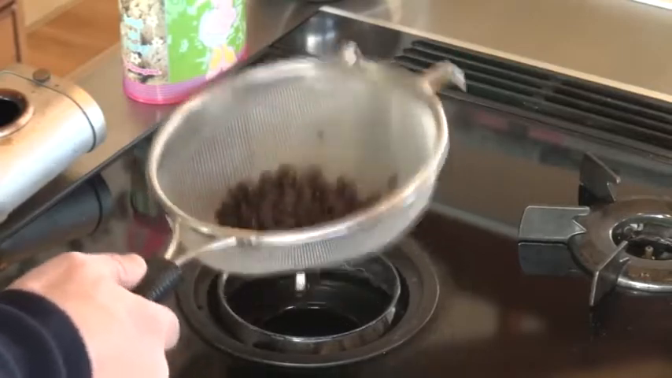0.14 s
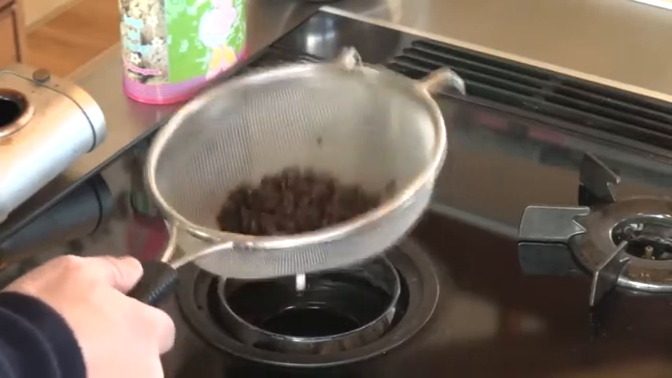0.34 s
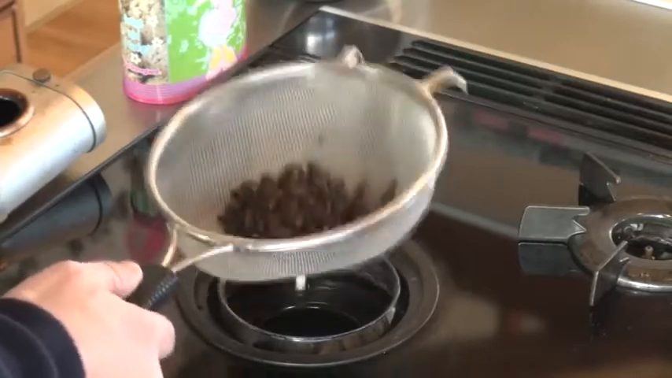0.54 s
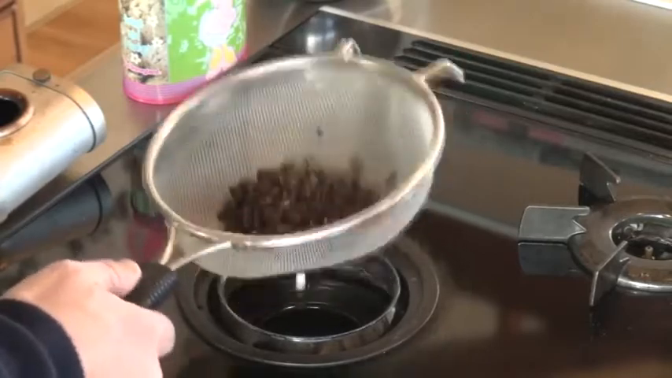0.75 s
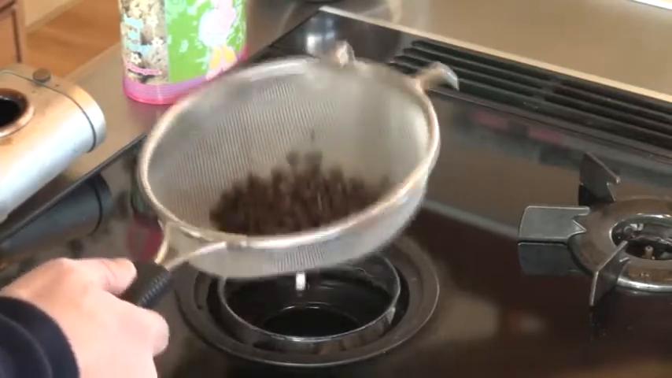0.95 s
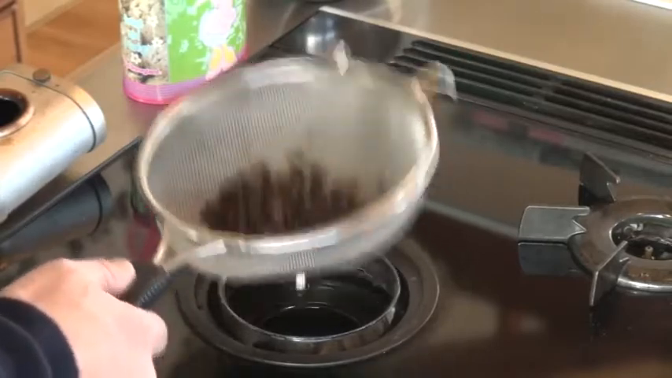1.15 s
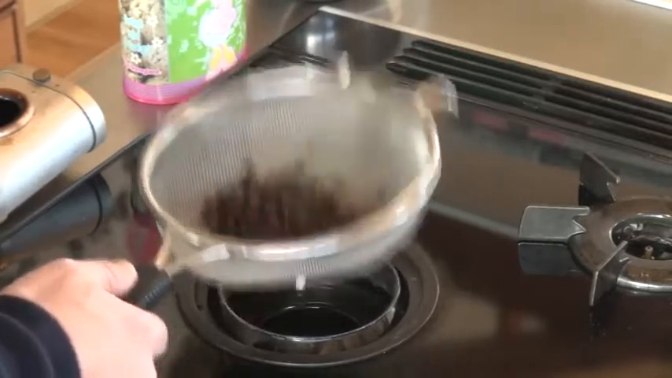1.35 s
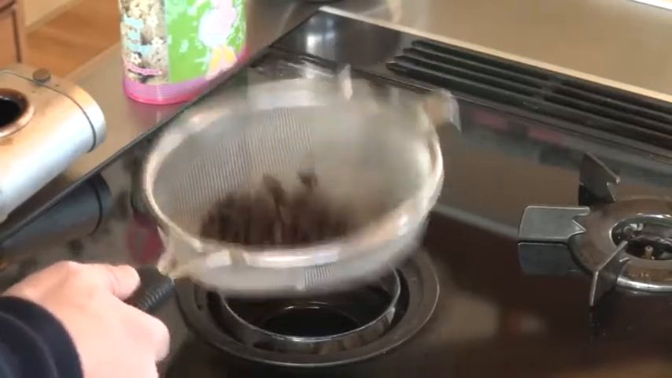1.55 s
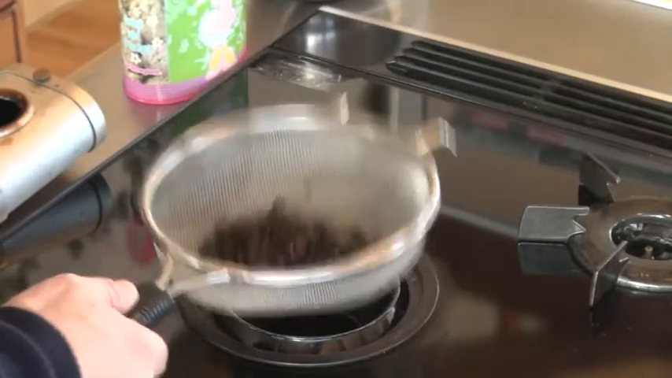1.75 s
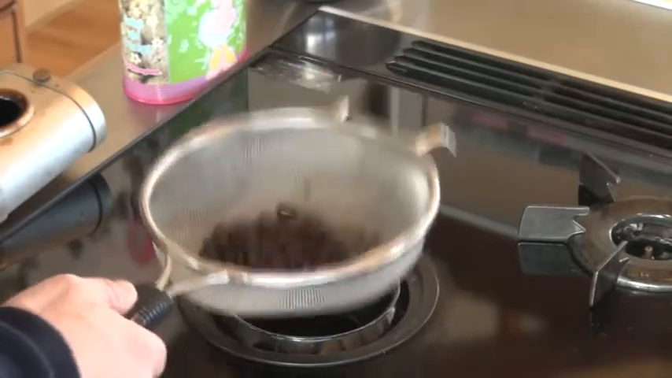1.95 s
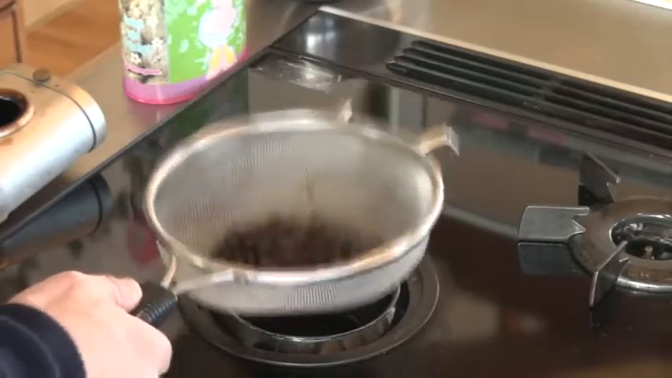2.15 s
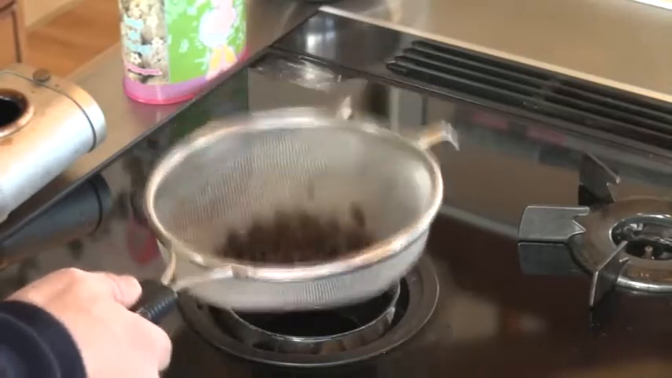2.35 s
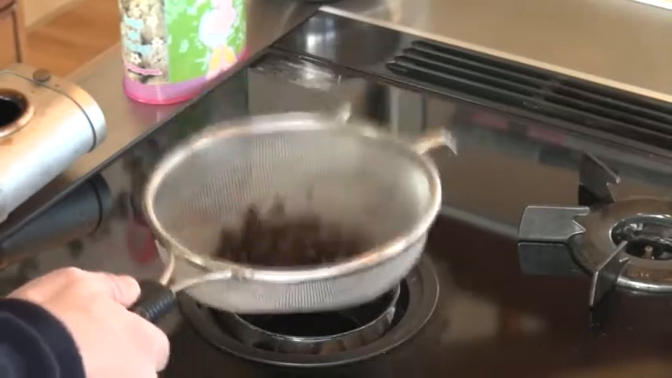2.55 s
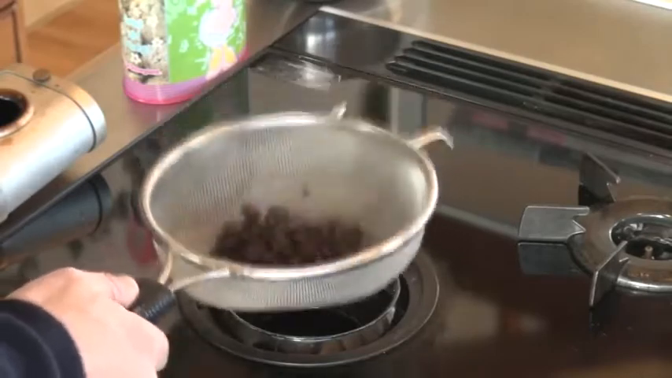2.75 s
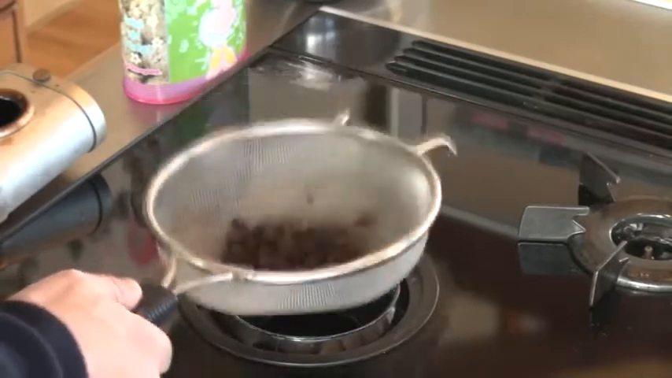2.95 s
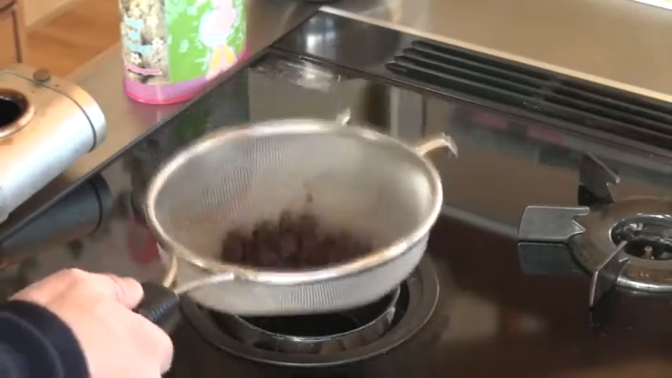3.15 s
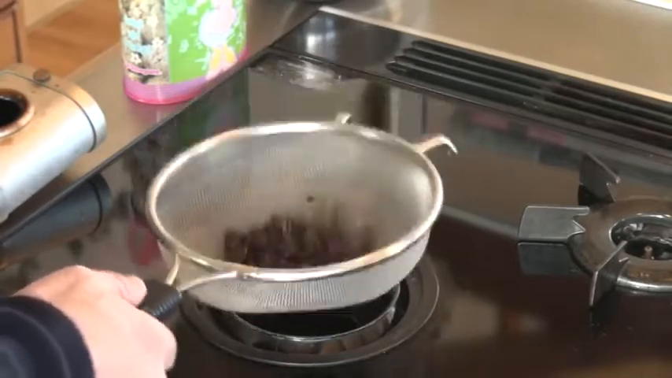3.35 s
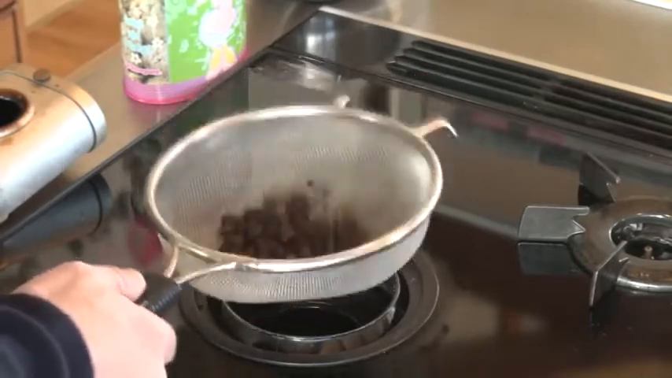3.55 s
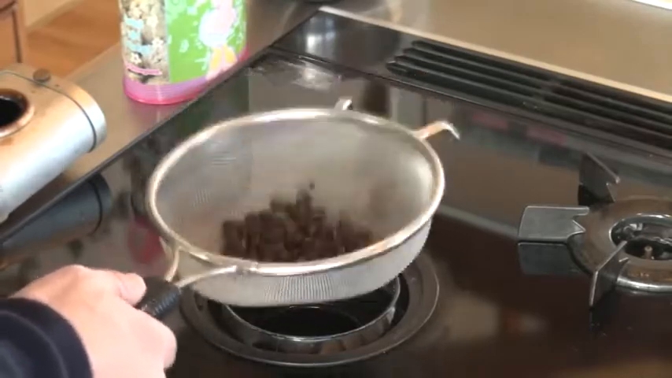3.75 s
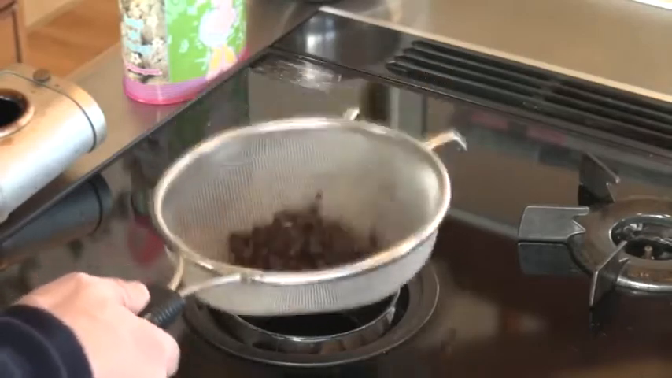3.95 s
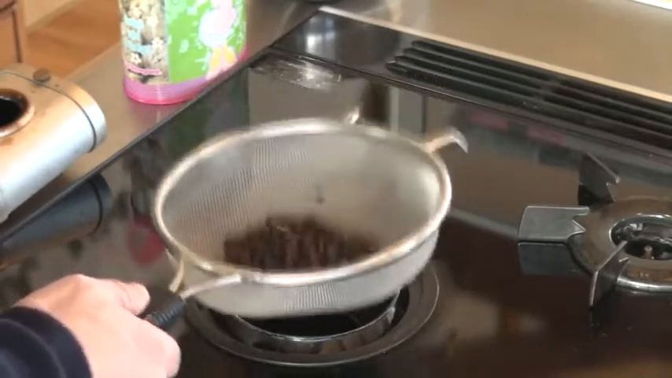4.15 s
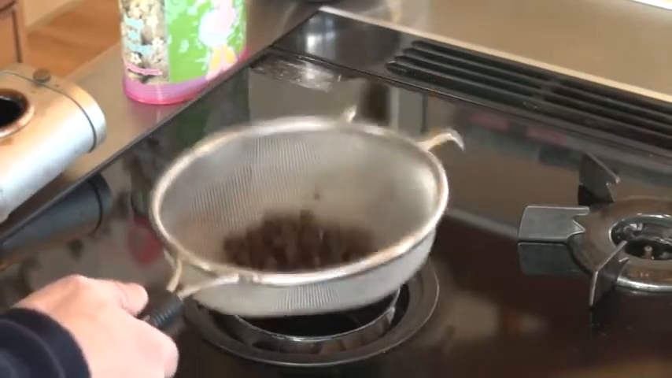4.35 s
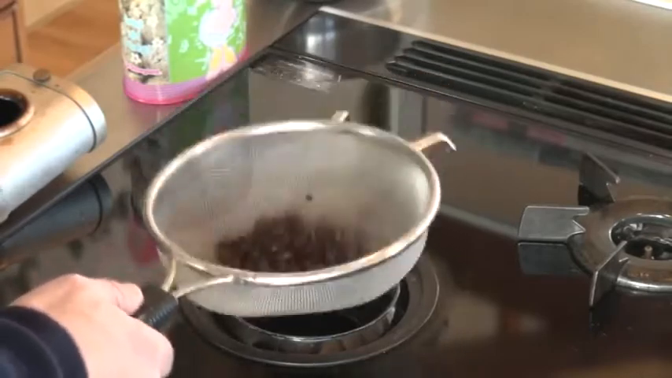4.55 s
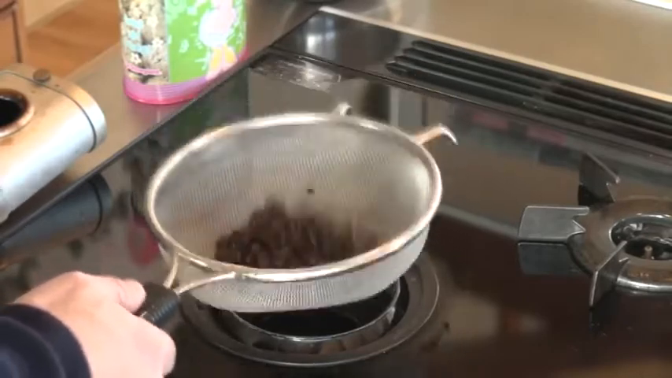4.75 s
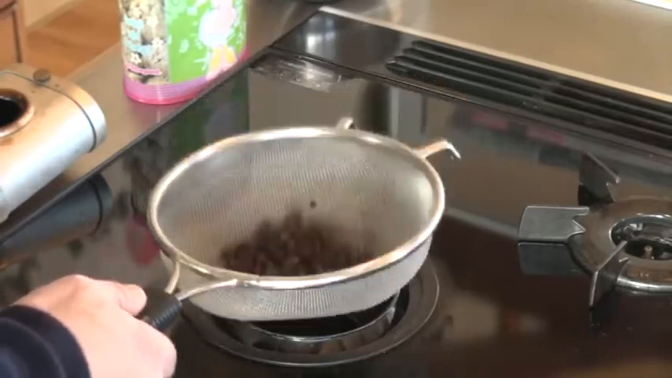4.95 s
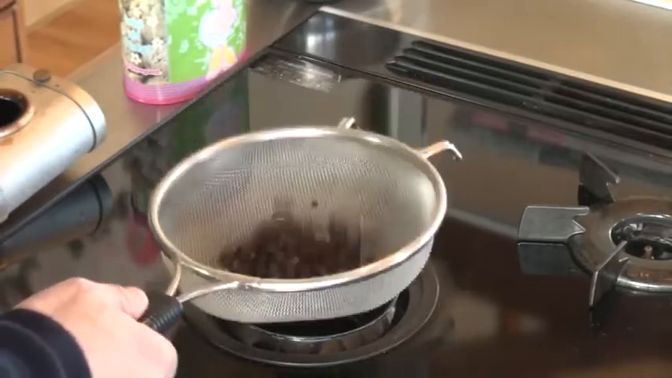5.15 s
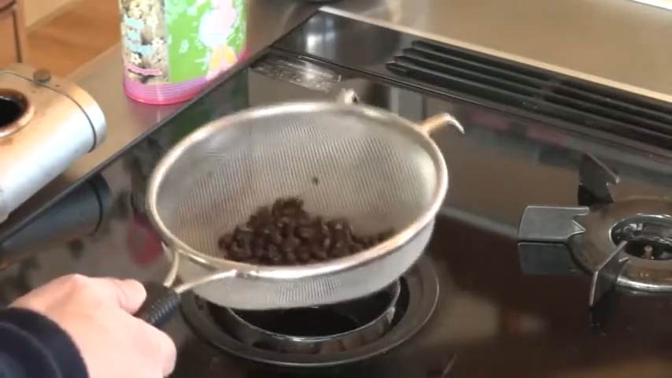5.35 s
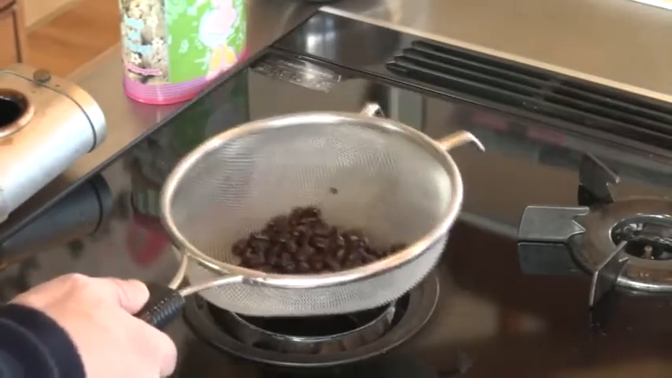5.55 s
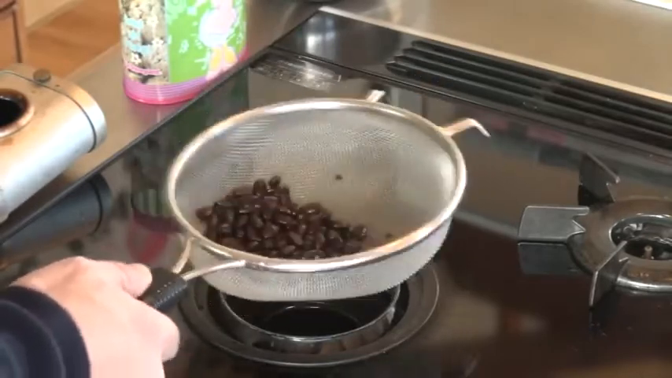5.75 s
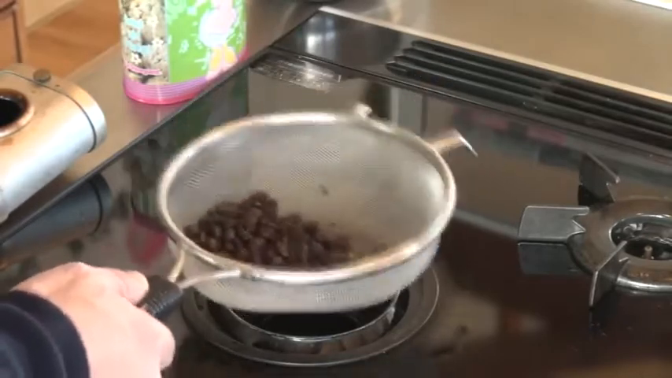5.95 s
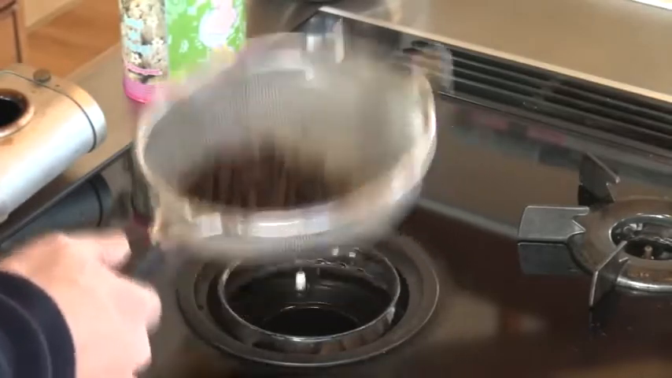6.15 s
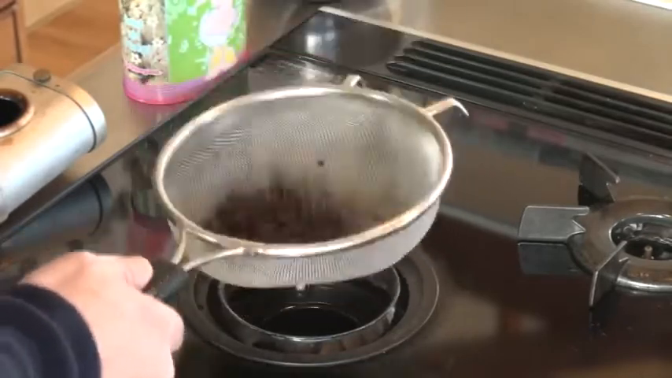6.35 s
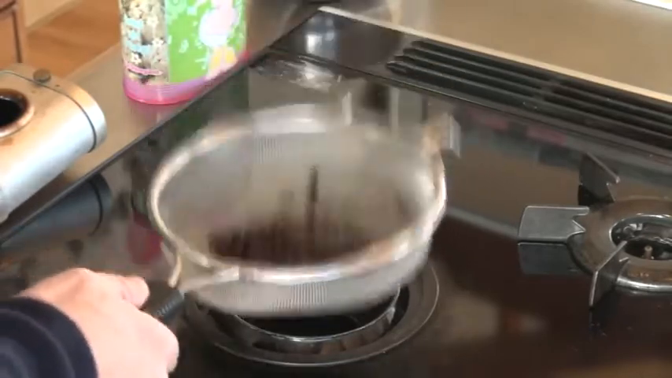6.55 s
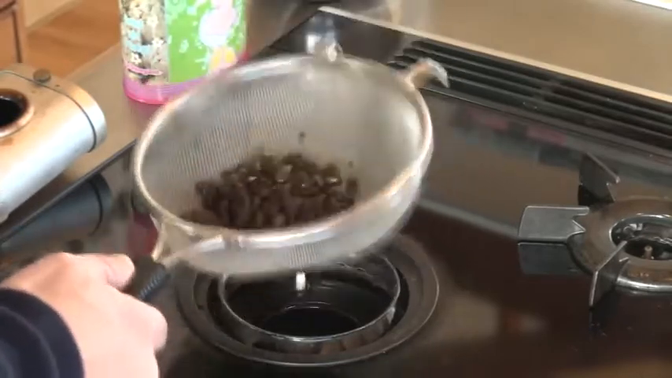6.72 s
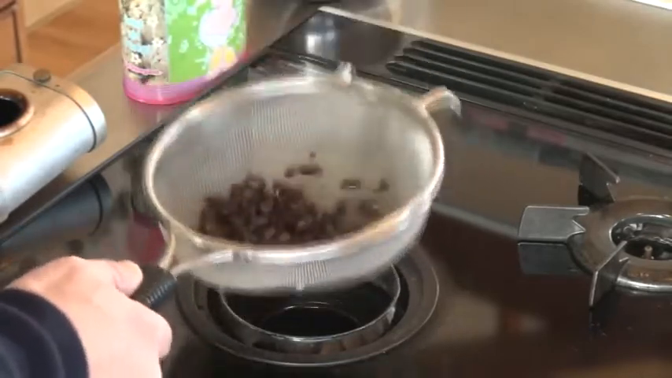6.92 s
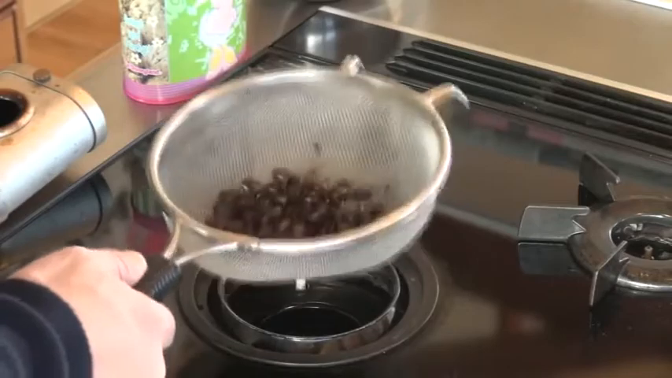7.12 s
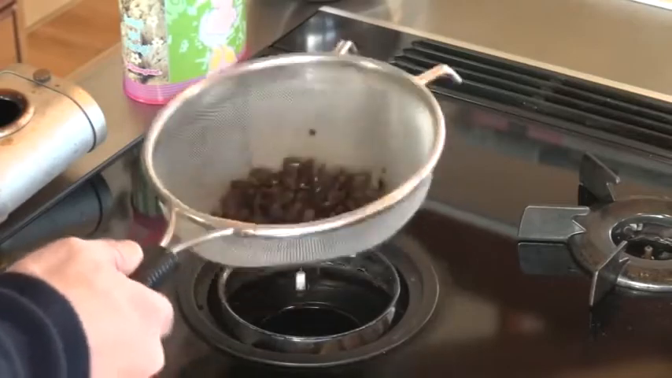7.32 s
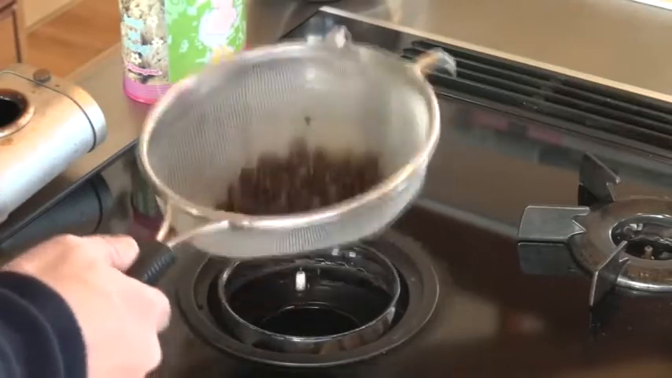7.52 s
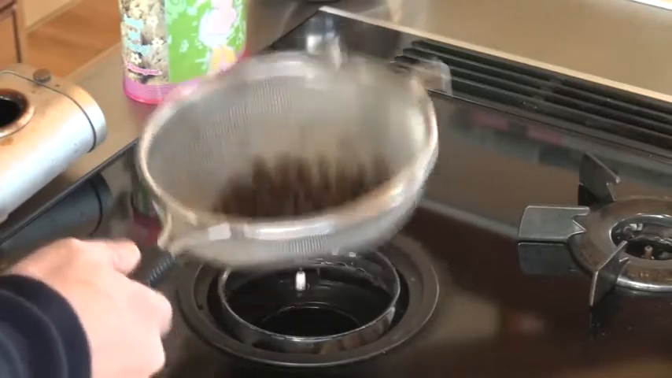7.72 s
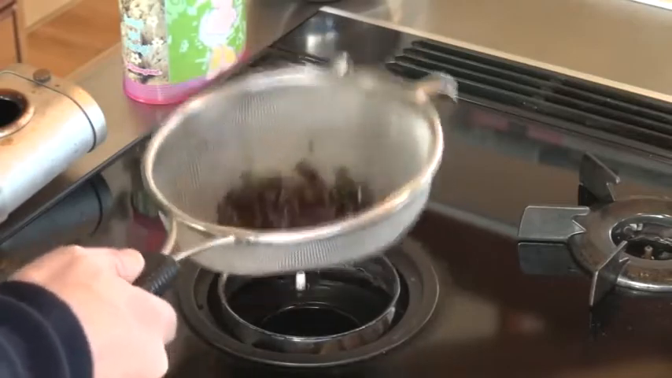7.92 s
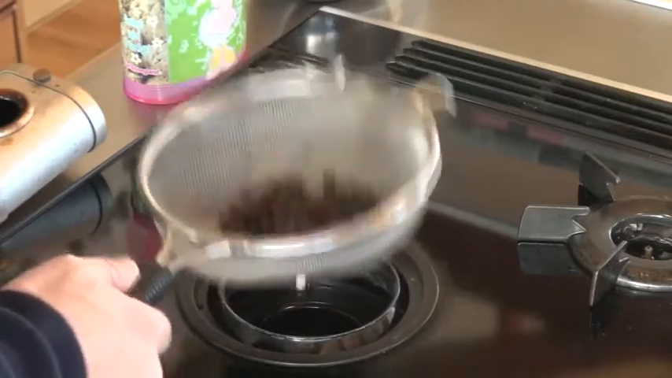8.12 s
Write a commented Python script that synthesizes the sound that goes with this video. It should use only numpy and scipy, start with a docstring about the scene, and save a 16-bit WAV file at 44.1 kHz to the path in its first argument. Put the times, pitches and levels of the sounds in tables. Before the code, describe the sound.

From the start, roasted coffee beans are tossed in a wire mesh strainer in a steady rhythm of about five shakes a second. Each landing is a short, bright, dry shower of tiny clicks that lightly rings the wires, varying a little in strength. At about 5.3 seconds the tossing stops, and a couple of faint ticks follow. From roughly 5.7 to 6.2 seconds the beans slide round the bowl in a softer, duller swirl. At 6.5 seconds a sharp landing restarts the shaking, which continues a little less evenly until about 8.3 seconds, with a few stray beans ticking in between tosses. Throughout, an extractor fan runs underneath with a quiet, steady hum and rush of air. The strainer sits straight ahead, and the small kitchen adds short reflections to every rattle.

```python
"""A small kitchen, an extractor fan humming steadily. Roasted coffee beans are tossed in a wire-mesh
strainer about five times a second, with one pause to swirl them. Each landing is a short shower
of tiny impacts that ring the mesh; a few strays tick in late, and the room answers.
The hum is turbulent air ringing the fan's hood and duct."""
import sys
import numpy as np
from scipy import signal
from scipy.fft import rfft, irfft
from scipy.io import wavfile

SR = 44100
rng = np.random.default_rng(int(sys.argv[2]) if len(sys.argv) > 2 else 0)


def store_pcm(level_fs):
    """Save levels as 16-bit WAV."""
    pcm = np.round(np.clip(level_fs, -1, 1) * 32767).astype(np.int16)
    wavfile.write(sys.argv[1], SR, np.atleast_2d(pcm).T)


N = 365148
T = np.arange(N) / SR
HZ = np.arange(N // 2 + 1) * SR / N + 1e-3


def undb(db):
    """Decibels to gain."""
    return 10 ** (np.asarray(db) / 20)


def unit_rms(x):
    """Scale to an rms of one."""
    return x / np.sqrt(np.mean(x ** 2))


def colour(outline, resonances=()):
    """Gain over HZ: an interpolated outline, lifted by resonances."""
    hz, db = np.transpose(outline)
    power = 1 + sum((undb(lift_db) ** 2 - 1) / (1 + (2 * (HZ - centre_hz) / width_hz) ** 2) ** 2
                    for centre_hz, width_hz, lift_db in resonances)
    return undb(np.interp(np.log(HZ), np.log(hz), db)) * np.sqrt(np.abs(power))


def shape(x, gain):
    """Filter by a gain over HZ."""
    return irfft(rfft(x) * gain, N)


def stereo(mid, side, width, balance):
    """Mid and side to left and right; width and balance vary with frequency."""
    side = shape(side, colour(width))
    tilt = np.sqrt(colour(balance))
    return shape(np.array([mid + side, mid - side]), np.array([tilt, 1 / tilt]))


def fan(level_db=-55):
    """Turbulent air rings the hood and its duct; the rumble leans left."""
    # air rush: freq_hz, level_db
    air = [(25, -23), (50, -22.5), (85, -16.5), (105, -7), (140, -2), (210, -4.5), (340, -9), (600, -13.5),
           (860, -17.5), (1100, -15), (2100, -17.5), (2700, -21), (4000, -25.5), (9000, -48.5)]
    # hood and duct resonances: centre_hz, width_hz, lift_db
    hood = [(65.2, 3.7, 13.5), (137.4, 10, 4), (266, 10.3, 9.5), (317.7, 7, 5.5), (387, 22.6, 12),
            (450, 30, 9), (496, 24, 5), (714, 82, 12.5), (983, 33, 5), (1684, 29, 8), (2010, 25, 5),
            (2127, 35, 8.5), (2184, 29, 9)]
    # stereo spread: freq_hz, side_minus_mid_db
    width = [(30, -7), (70, -13), (140, -21), (400, -15), (720, -17), (950, -10.5), (1500, -19),
             (4000, -11), (6000, 1)]
    # lean: freq_hz, left_minus_right_db
    balance = [(110, 3), (300, .6), (1200, 0)]
    mid, side = shape(rng.standard_normal((2, N)), unit_rms(colour(air, hood)))
    return undb(level_db) * stereo(mid, side, width, balance)


def impacts(showers, peak_rate_hz, bounce_db, bounce_s, scatter_db=4, rise_share=.47):
    """Bean clicks as body and treble trains, thicker and harder as the heap lands."""
    power, treble_power = np.full((2, N), 1e-14)
    for peak_s, level_db, length_s, hard_db in showers:
        age_s = T - peak_s
        width_s = length_s * np.where(age_s < 0, rise_share, 1 - rise_share)
        steepness = np.where(age_s < 0, 2.15, 1.79)  # 2 is a bell curve
        landing = np.exp(-.5 * np.abs(age_s / width_s) ** steepness)
        bounces = undb(bounce_db) ** 2 * (age_s > 0) * np.exp(-np.abs(age_s) / bounce_s)
        snap = landing ** 1.21  # the hardest impacts are brightest
        dulling = undb(-4 - 35 * np.abs(age_s)) ** 2
        power += undb(level_db) ** 2 * (landing + bounces)
        treble_power += undb(level_db + hard_db) ** 2 * (snap + bounces * dulling)
    chance = np.minimum(peak_rate_hz / SR * (power / power.max()) ** .22, 1)
    size = unit_rms(undb(scatter_db * np.clip(rng.standard_normal(N), -2, 2)))
    polarity = rng.choice([-1, 1], N)
    clicks = size * polarity * (rng.random(N) < chance) / np.sqrt(chance)
    return clicks * np.sqrt([power, treble_power])


def tosses(usual_db=-36, usual_s=.022, usual_hard_db=-3.5):
    """The heap lands; higher throws land harder and more spread out, both adding treble."""
    # landings: peak_s, level_db, length_s
    landings = [(-0.005, -35, 0.022), (0.208, -38, 0.026), (0.408, -38, 0.022), (0.599, -35.5, 0.018),
                (0.796, -36.5, 0.021), (1.003, -34, 0.019), (1.214, -35.5, 0.02), (1.438, -34.5, 0.021),
                (1.65, -35.5, 0.025), (1.862, -35, 0.023), (2.064, -38.3, 0.026), (2.273, -37, 0.023),
                (2.477, -36.5, 0.024), (2.688, -35.5, 0.024), (2.881, -37.5, 0.024), (3.086, -35.5, 0.02),
                (3.286, -36, 0.022), (3.495, -37.5, 0.023), (3.698, -35.5, 0.019), (3.889, -36, 0.019),
                (4.084, -36.5, 0.019), (4.276, -39, 0.021), (4.485, -35, 0.02), (4.696, -36.5, 0.022),
                (4.898, -38, 0.024), (5.098, -37, 0.021), (5.295, -35, 0.02), (6.501, -32.5, 0.019),
                (6.714, -41.5, 0.029), (6.953, -35.5, 0.025), (7.135, -39.5, 0.025), (7.341, -40, 0.023),
                (7.563, -38, 0.022), (7.798, -33, 0.021), (7.998, -46, 0.025), (8.033, -46, 0.016),
                (8.2, -37, 0.021)]
    showers = []
    for peak_s, level_db, length_s in landings:
        hard_db = usual_hard_db + .38 * (level_db - usual_db) + 250 * (length_s - usual_s)
        showers.append((peak_s, level_db, length_s, hard_db))
    return impacts(showers, peak_rate_hz=12000, bounce_db=-14, bounce_s=.036)


def mesh(clicks, crossover_hz=8800, tick_s=.00066, ring_s=.0073, ring_db=-16, spots=10):
    """Each spot of the mesh gives its own dry tick and short ring of wires; returns mid and side."""
    # bean on mesh: freq_hz, level_db
    spectrum = [(400, -31), (900, -21), (1600, -12), (2200, -11), (3100, -11.5), (4200, -5.5), (5300, -5.5),
                (6300, -.5), (7300, 0), (8200, -4.5), (9300, -10.5), (11800, -4.5), (14000, -6),
                (16000, -8.5)]
    # bowl and rim resonances: centre_hz, width_hz, lift_db
    rim = [(2497, 97, 10), (2592, 55, 7.5), (2698, 65, 6.5), (4630, 410, 2), (6250, 330, -0.1)]
    high = 1 / (1 + (crossover_hz / HZ) ** 8)
    struck_spot = rng.integers(0, spots, N)
    age_s = T[:SR // 16]
    decay = np.exp(-age_s / tick_s) + undb(ring_db) * np.exp(-age_s / ring_s)
    ringing, power = 0, 0
    for spot in range(spots):
        body, treble = rfft(clicks * (struck_spot == spot))
        response = rfft(rng.standard_normal((2, len(age_s))) * decay, N)
        ringing += (body * (1 - high) + treble * high) * response
        power += np.abs(response) ** 2 / spots
    # together the spots have the colour of the whole bowl
    return irfft(ringing / np.sqrt(power) * unit_rms(colour(spectrum, rim)), N)


def kitchen(x, level_db=-7.5, body_t60_s=.35, treble_t60_s=.25, crossover_hz=8500, build_s=.0054):
    """Dense reflections from walls and worktop; the treble is weaker and dies sooner."""
    age_s = T[:SR // 2]
    high = 1 / (1 + (crossover_hz / HZ) ** 10)
    wander_rad = 2 * np.pi * 1.1 * T  # the strainer moves, so the echo pattern shifts
    reverb = 0
    for band, t60_s in ((1 - high, body_t60_s), (high * undb(-5), treble_t60_s)):
        envelope = undb(-60 * age_s / t60_s) * (1 - np.exp(-age_s / build_s))
        part = shape(x, band)
        for share in (np.cos(wander_rad), np.sin(wander_rad)):
            echoes = rng.standard_normal((2, len(age_s))) * envelope / np.linalg.norm(envelope)
            reverb += signal.fftconvolve((part * share)[None], echoes, axes=1)[:, :N]
    return undb(level_db) * reverb


def strays(contact_s=.0031):
    """Lone beans chatter over a few wires as they land; returns body and treble."""
    # single drops: start_s, level_db, hard_db
    drops = [(5.448, -61, -2), (5.467, -62, -1), (6.412, -66, 2), (6.479, -36, -2.5), (6.771, -51, 5),
             (7.201, -44, -2), (7.368, -50, 13.5), (8.119, -65, 7)]
    chatter = np.zeros((2, N))
    for start_s, level_db, hard_db in drops:
        contact = (T > start_s) * np.exp(-np.abs(T - start_s) / contact_s) * rng.standard_normal(N)
        chatter += undb([[level_db], [level_db + hard_db]]) * contact
    return chatter


def swirl(hard_db=-14):
    """Beans slide round the bowl in soft, dull showers."""
    # slides: peak_s, level_db, length_s
    slides = [(5.739, -55.5, 0.03), (5.845, -47, .048), (5.952, -49, .037), (6.051, -51, .032),
              (6.16, -56, 0.034)]
    showers = [(*slide, hard_db) for slide in slides]
    return impacts(showers, peak_rate_hz=11000, bounce_db=-22, bounce_s=.02)


def scene():
    """Strainer straight ahead, reflections all round, over the running fan."""
    # diffuse spread, nearly mono below 5 kHz: freq_hz, side_minus_mid_db
    width = [(1000, -13), (1900, -22), (2600, -13), (3600, -15.5), (4500, -12), (5400, 1), (7300, -0.5),
             (9500, 4.5), (15500, -3.5)]
    # treble lean: freq_hz, left_minus_right_db
    balance = [(5000, 0.5), (5600, 1.4), (7500, 0.5), (9000, 1), (10600, -1.5), (13000, 0)]
    direct_mid, direct_side = mesh(tosses() + swirl() + strays())
    room_mid, room_side = kitchen(direct_mid)
    beans = stereo(direct_mid + room_mid, undb(-10) * direct_side + room_side, width, balance)
    return beans + fan()


def record(dry, cutoff_hz=15680):
    """Steep elliptic low-pass."""
    return signal.sosfilt(signal.ellip(10, .2, 70, cutoff_hz, fs=SR, output="sos"), dry)


dry = scene()
out = record(dry)
store_pcm(out)
```